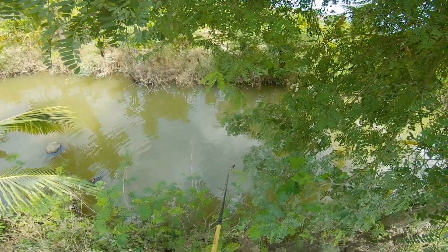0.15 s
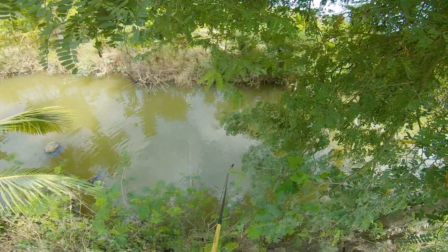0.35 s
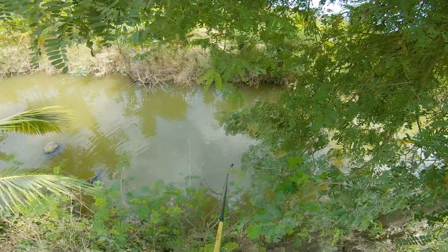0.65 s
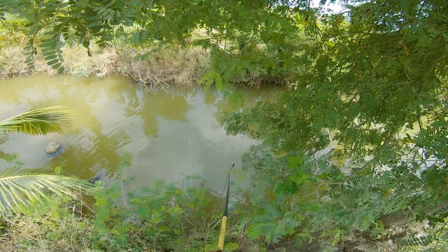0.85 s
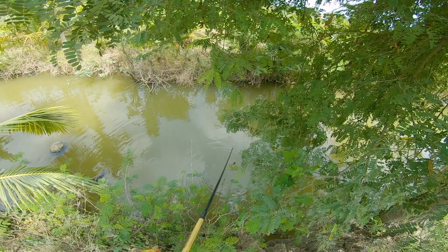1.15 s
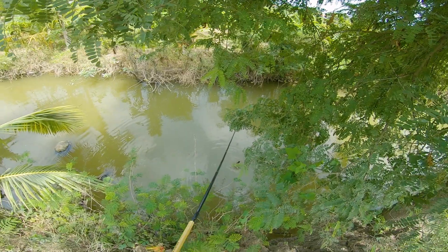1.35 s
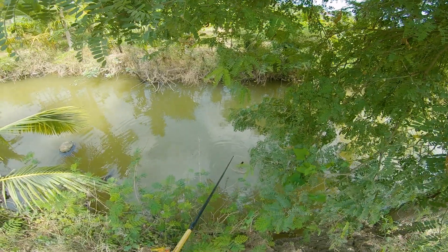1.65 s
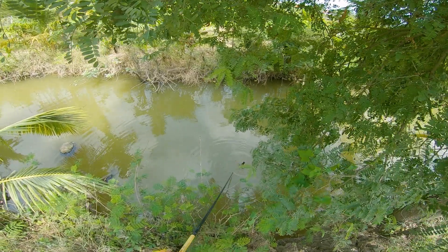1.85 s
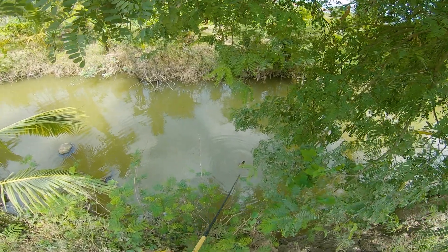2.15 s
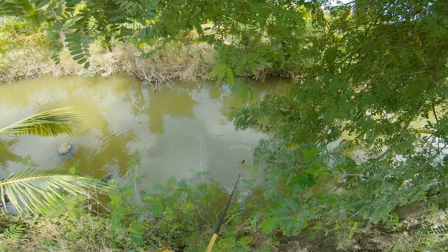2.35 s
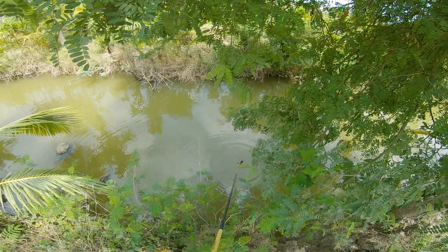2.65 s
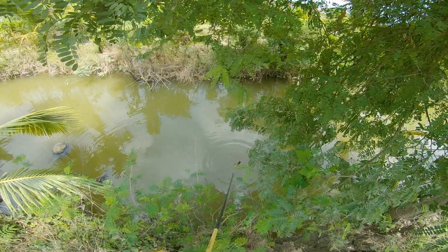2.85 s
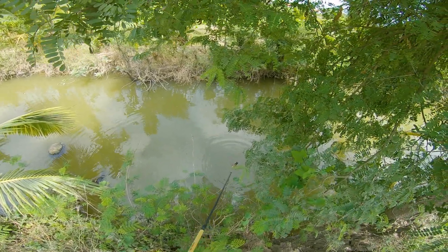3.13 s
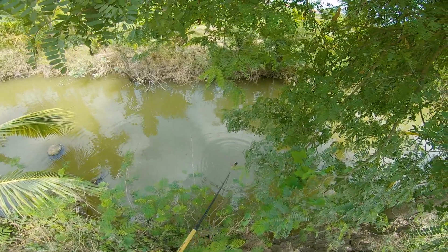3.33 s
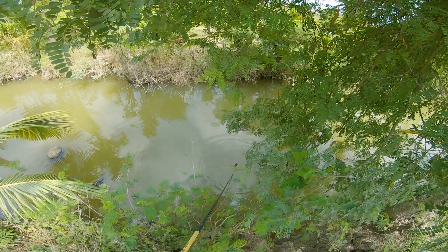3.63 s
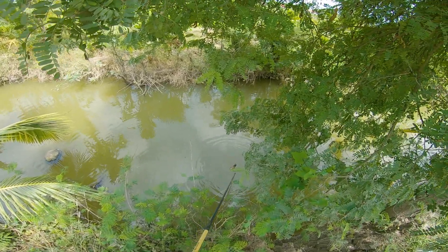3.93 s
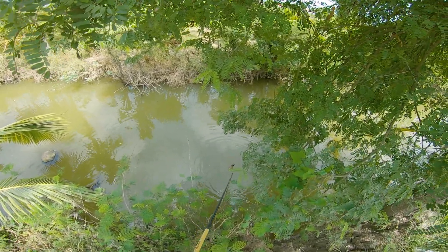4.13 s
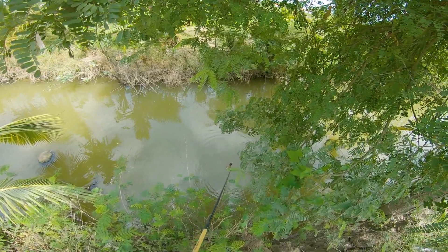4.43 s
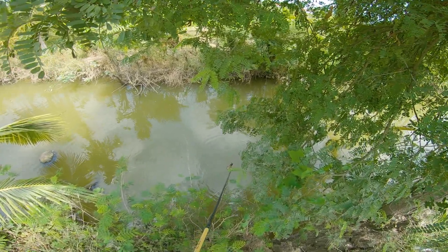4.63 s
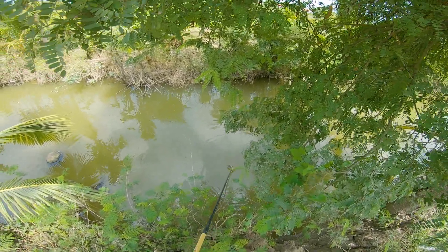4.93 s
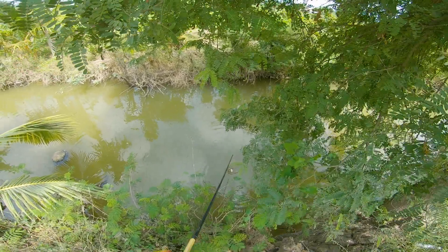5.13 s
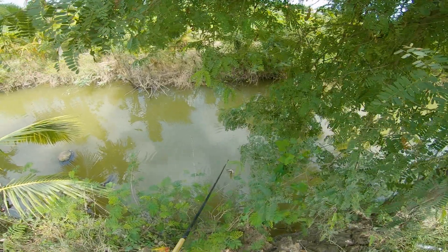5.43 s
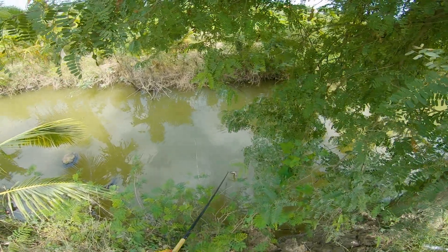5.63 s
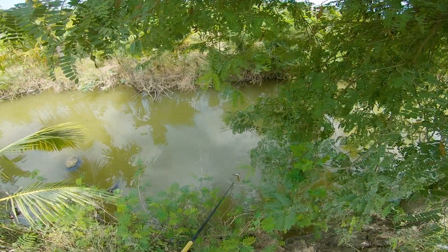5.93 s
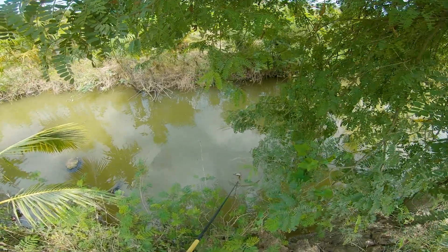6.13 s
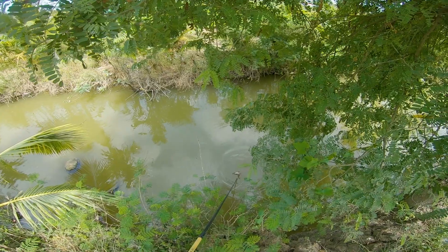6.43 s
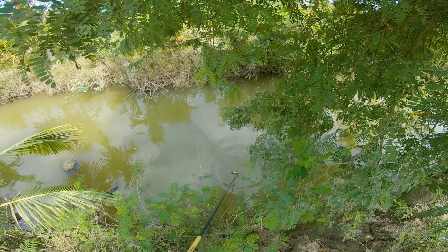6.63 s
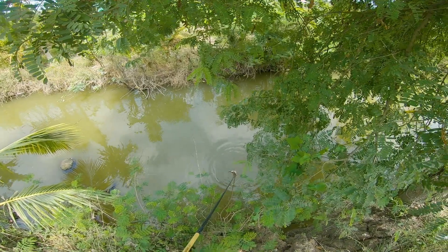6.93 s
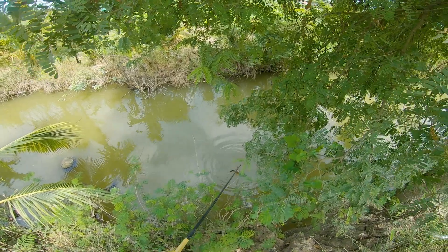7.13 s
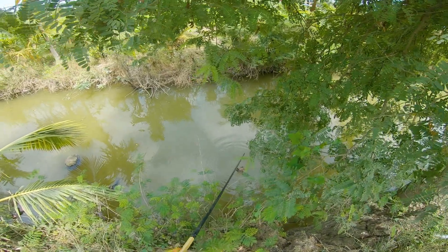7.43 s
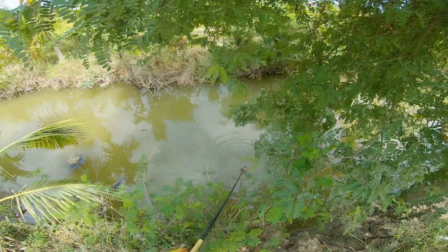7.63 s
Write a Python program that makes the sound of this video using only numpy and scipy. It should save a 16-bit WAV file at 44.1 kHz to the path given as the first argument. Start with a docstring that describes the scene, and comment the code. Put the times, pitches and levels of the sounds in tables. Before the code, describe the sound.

A calm outdoor place with trees, soft hush and faint, uneven low air rumble, strongest in the first two seconds. Tiny chirps begin at once; thin whistles sweep upward into a flick at about 0.6, 3.0, 4.9 and 6.7 s. Distant doves trill from 1.1 s, while leaves brush softly and dull twigs snap around 1.6-1.75 s. A clear near dove, left of centre, coos at 1.9, 4.3 and 7.15 s: a fast, throaty stutter around 1.2 kHz, slowing over half a second to a longer last note. Far doves overlap at 2 s and answer again from 5.4 to 6.7 s. A small bird rasps seven quick dry notes at 3.9-4.35 s. A faint, very high insect throbs increasingly. Close leaves rustle from 5.1 to 6.3 s with a crisp snap near 5.5, then again from 7.2 s, with sharp cracks at 7.6 and 7.7 s.

```python
"""Beside a pond, a dove coos three stuttering phrases; other doves answer from farther off. Doves are gliding
tones through a throat resonance; small birds whistle and chirp as bare gliding tones. Scolding notes are bursts
of band noise, and an insect is narrow-band noise that throbs at a high pitch. Close by, something rustles in
coloured slips, twigs snap in bursts, and one stem rings as it breaks. Moving air is a soft low rumble of noise
under the hush of the trees."""
import sys
import numpy as np
from scipy import signal
from scipy.fft import rfft, irfft, next_fast_len
from scipy.io import wavfile
from scipy.ndimage import uniform_filter1d, map_coordinates

SR = 44100
rng = np.random.default_rng(int(sys.argv[2]) if len(sys.argv) > 2 else 0)


def dump(signal):
    """Clip the signal to [-1, 1] and save it as 16-bit WAV at the path in sys.argv[1]."""
    limited = np.clip(np.atleast_2d(signal).T, -1, 1)
    pcm = np.round(limited * 32767).astype(np.int16)
    wavfile.write(sys.argv[1], SR, pcm)


N = 342944  # length [samples]


def amp(db):
    """Level to amplitude: 20 dB is a factor of ten."""
    return 10 ** (np.asarray(db) / 20)


def unit(x):
    """Normalisation: scale to an rms of 1."""
    return x / np.sqrt(np.mean(x ** 2) + 1e-20)


def clock():
    """Sampling: the time of every sample [s]."""
    return np.arange(N) / SR


def along(points, hz):
    """Interpolation of (frequency [Hz], value) points along a logarithmic frequency axis."""
    f, v = np.transpose(points)
    return np.interp(np.log(hz + 1), np.log(f + 1), v)


def gains(rows):
    """Envelopes: a gain per sample for each level column, silent outside the rows."""
    s, *columns = np.transpose(rows)
    return [amp(np.interp(clock(), s, c, left=-np.inf, right=-np.inf)) for c in columns]


def wobble(rate):
    """Random modulation: a smooth curve through normally distributed knots, rate knots a second."""
    knots = rng.standard_normal(int(N * rate / SR) + 4)
    return map_coordinates(knots, [clock() * rate])


def filtered(x, response):
    """Linear filtering: the spectrum of x times a complex response of frequency."""
    m = next_fast_len(N + SR // 2)
    return irfft(rfft(x, m) * response(np.fft.rfftfreq(m, 1 / SR)), m)[..., :N]


# Coherence of a diffuse field between left and right: (frequency [Hz], correlation [-1 to 1])
COHERENCE = [(25, .5), (70, .72), (300, .5), (700, .1), (1400, -.35), (3000, .05), (10000, 0)]


def stereo(pair, spectrum):
    """Partial coherence: colour two unrelated signals and blend them as mid and side, rms 1."""
    def blend(hz):
        angle = np.arccos(np.clip(along(COHERENCE, hz), -1, 1)) / 2
        return amp(along(spectrum, hz)) * [np.cos(angle), np.sin(angle)]

    mid, side = filtered(pair, blend)
    return unit(np.array([mid + side, mid - side]))


def panned(x, pan_db):
    """Level difference between the channels: louder on the left by pan_db."""
    return x * amp([[pan_db / 2], [-pan_db / 2]])


# Decay of the scattered sound among the trees: (frequency [Hz], time to fall by 60 dB [s])
TREE_DECAY = [(500, 0.24), (1200, 0.36), (5000, 0.53), (10000, 0.079)]


def placed(x, pan_db, lag_ms, wet_db):
    """Localisation by level and delay (left late by lag_ms), plus exponentially decaying scattering."""
    f, t, z = signal.stft(rng.standard_normal((2, SR // 2)), SR, nperseg=256)
    decay = amp(-60 * t / along(TREE_DECAY, f)[:, None])
    tail = signal.istft(z * decay, SR, nperseg=256)[1]
    tail = tail / np.linalg.norm(tail[0])
    echo = signal.fftconvolve(x[None], tail, axes=1)[:, :N]
    # half the lag delays the left, the other half advances the right
    direct = filtered(x, lambda hz: np.exp(np.outer([-1j, 1j], np.pi * hz * lag_ms / 1000)))
    return panned(direct, pan_db) + amp(wet_db) * echo


def sing(notes, fade, sag_db, jitter, flutter_db, swell_db=0):
    """Phase integration: a sine follows each note (s, length s, start, middle, end Hz, dB) along a parabola."""
    t, pitch, level, voiced = clock(), np.zeros(N), np.zeros(N), np.zeros(N)
    for s, length, start_hz, middle_hz, end_hz, db in notes:
        span = slice(int(s * SR), int((s + length) * SR))
        u = (t[span] - s) / length
        pitch[span] = (start_hz * (1 - u) * (1 - 2 * u)
                       + middle_hz * 4 * u * (1 - u)
                       + end_hz * u * (2 * u - 1))
        # the level swells through the note and sags where the pitch falls below its middle
        fallen = np.clip((middle_hz - pitch[span]) / (abs(middle_hz - end_hz) + 100), 0, 1)
        level[span] = amp(db - swell_db * (1 - u) - sag_db * u * u * fallen)
        voiced[span] = 1
    pitch = np.interp(t, t[voiced > 0], pitch[voiced > 0]) * (1 + jitter * wobble(300))
    window = np.hanning(int(fade * SR) + 3)
    level = signal.fftconvolve(level, window / window.sum(), "same") * amp(flutter_db * wobble(90))
    return np.sqrt(2) * level * np.sin(2 * np.pi * np.cumsum(pitch) / SR)


# Swells of the low rumble: (time [s], relative level [dB])
RUMBLE_LEVEL = [(0.0, -44), (0.04, -45), (0.3, -53.5), (0.37, -43.5), (0.69, -67), (0.86, -40.5),
                (0.95, -40), (1.28, -66), (1.36, -58), (1.54, -61), (1.75, -43), (1.95, -52.5),
                (3.51, -70.5), (3.61, -52.5), (3.81, -69.5), (4.12, -53), (4.4, -60.5), (4.44, -49.5),
                (4.55, -69), (5.52, -56), (5.7, -77), (5.83, -47.5), (5.89, -75), (5.91, -63),
                (6.56, -72.5), (6.69, -52), (6.73, -72), (6.84, -43.5), (6.91, -60), (7.3, -62),
                (7.32, -48), (7.62, -73), (7.69, -52), (7.78, -61)]
# Colour of the rumble: (frequency [Hz], relative density [dB per Hz])
RUMBLE_COLOUR = [(12, -36), (20, -12.5), (48, 5), (64, 5.5), (108, -11), (300, -30), (390, -63),
                 (660, -120)]
# Colour of the hush in the trees: (frequency [Hz], relative density [dB per Hz])
HUSH_COLOUR = [(59, -15.5), (100, 0.5), (258, -6), (370, -13), (447, -12.5), (497, -16), (843, -9),
               (998, -13.5), (1290, -10), (4960, -21), (6810, -25.5), (8410, -29), (11100, -34.5),
               (12600, -65), (15500, -59)]


def air(lumps_db=2.5):
    """Broadband flow noise: a low, lumpy rumble under the wavering hush of the trees."""
    lumps = amp(lumps_db * wobble(11))
    rumble = gains(RUMBLE_LEVEL)[0] * lumps * stereo(rng.standard_normal((2, N)), RUMBLE_COLOUR)
    hush = amp(-61.5 + 2.6 * wobble(3.183)) * stereo(rng.standard_normal((2, N)), HUSH_COLOUR)
    return panned(amp(-0.14) * rumble + hush, pan_db=-1.1)


# Strength of the insect before throbbing: (time [s], level [dB])
INSECT_LEVEL = [(0, -81), (1, -76), (3.2, -74), (4.1, -66), (5, -65), (6, -63), (7.8, -63)]
CALM_RATE, EAGER_RATE, EAGER_S = 6.52, 7.44, 3.53  # throbs [per s], calm and eager; turns eager at [s]


def insect(tick_rate=115, centre_hz=8570, width_hz=300, glide_hz=90):
    """Amplitude modulation: wing ticks and slower throbs shape a narrow band that rises in each throb."""
    t = clock()
    turn = 2 * np.pi * (CALM_RATE * t + (EAGER_RATE - CALM_RATE) * np.maximum(t - EAGER_S, 0))
    throb = np.abs(np.cos(turn / 2)) ** .8
    ticks = 1.7 ** np.cos(2 * np.pi * np.cumsum(tick_rate * (1 + .02 * wobble(8))) / SR)
    # low-passed noise moved up onto a gliding carrier
    band = filtered(rng.standard_normal((2, N)), lambda hz: 1 / (1 + (hz / width_hz) ** 2))
    ring = band * np.cos(2 * np.pi * np.cumsum(centre_hz + glide_hz * np.sin(turn)) / SR)
    return panned(unit(ring * ticks) * throb * gains(INSECT_LEVEL)[0], pan_db=3)


def chorus(count=70):
    """Superposition: many faint gliding notes of birds deep in the trees."""
    s, length, hz, glide, db = rng.random((5, count))
    start = (np.arange(count) + s / 2) * (N / SR - .1) / count
    hz = 2300 + 3200 * hz * hz
    glide = 1 + 0.23 * (glide - .5)
    notes = np.transpose([start, .02 + .035 * length, hz / glide, hz, hz * glide, -77.5 + 6 * db])
    return sing(notes, fade=.012, sag_db=2, jitter=.05, flutter_db=3)


# Rising whistles: (time where the slide breaks into the flick [s], relative level [dB])
WHISTLE_NOTES = [(.636, -54), (2.976, -55), (4.898, -56.5), (6.682, -53.5)]
# Thin chirps: (time [s], length [s], start pitch [Hz], end pitch [Hz], relative level [dB])
CHIRP_NOTES = [(.11, 0.019, 4650, 6300, -69.5), (.28, 0.024, 4640, 4250, -65),
               (0.349, 0.034, 4800, 4110, -62), (0.372, 0.052, 6550, 5520, -68),
               (0.866, .025, 6200, 5200, -62), (.94, .03, 3850, 5320, -63.5), (.995, .035, 4100, 3920, -57),
               (1.016, 0.055, 3480, 2960, -59.5), (2.319, 0.053, 2800, 2180, -61.5),
               (2.44, 0.051, 3370, 3320, -66), (2.793, .1, 6000, 4940, -67.5),
               (3.242, 0.024, 5480, 6290, -63), (3.331, .02, 4150, 5300, -65),
               (4.983, 0.047, 2890, 2185, -57.5), (6.326, .02, 4670, 4350, -61),
               (6.366, .02, 4730, 4400, -59), (6.395, 0.024, 4900, 4400, -64)]
SLIDE_S, SLIDE_HZ, SLIDE_SWELL_DB = .125, (3750, 4600, 5040), 11.5  # length; start, middle, end; growth
FLICK_S, FLICK_HZ, FLICK_DB = .075, (5156, 5990, 6455), -2  # length; start, middle, end; re the slide


def small_birds():
    """Frequency modulation: whistles swell up a slide into a flick, chirps glide straight; foliage smears all."""
    slides = [(s - SLIDE_S, SLIDE_S, *SLIDE_HZ, db) for s, db in WHISTLE_NOTES]
    flicks = [(s, FLICK_S, *FLICK_HZ, db + FLICK_DB) for s, db in WHISTLE_NOTES]
    glides = [(s, length, start, (start + end) / 2, end, db) for s, length, start, end, db in CHIRP_NOTES]
    whistles = sing(slides, fade=.014, sag_db=0, jitter=.02, flutter_db=2.5, swell_db=SLIDE_SWELL_DB)
    whistles = whistles + sing(flicks, fade=.014, sag_db=0, jitter=.014, flutter_db=2)
    chirps = sing(glides, fade=.012, sag_db=0, jitter=.035, flutter_db=3)
    return (amp(-1) * placed(whistles, pan_db=6.5, lag_ms=0.044, wet_db=0)
            + amp(-4.5) * placed(chirps, pan_db=-10, lag_ms=0, wet_db=0)
            + amp(-1) * placed(chorus(), pan_db=0, lag_ms=0, wet_db=-3.5))


# A small bird's dry scolding notes: (time of the peak [s], level [dB])
SCOLD_NOTES = [(3.925, -68), (3.987, -64), (4.055, -62), (4.125, -61), (4.191, -59), (4.26, -61.5),
               (4.35, -65.5)]


def scolding(length=0.0091):
    """Gated band noise: short raspy notes with Gaussian envelopes in a quick row."""
    level = sum(amp(db) * np.exp(-.5 * ((clock() - s) / length) ** 2) for s, db in SCOLD_NOTES)
    # (frequency [Hz], relative level [dB])
    colour = [(2000, -55.0), (3500, -10.5), (5000, -9), (6500, -2), (7600, -13), (9000, -42)]
    rasp = filtered(rng.standard_normal(N), lambda hz: amp(along(colour, hz)))
    return placed(level * unit(rasp), pan_db=-6, lag_ms=0, wet_db=-3)


def crackle(rate, spread_db, hiss, patchy_db):
    """Stick-slip friction: sparse slips of uneven size on hiss; the colour shifts in patches."""
    slips = (rng.random((2, N)) < rate / SR) * rng.standard_normal((2, N))
    sizes = amp(spread_db * np.minimum(rng.exponential(size=(2, N)), 2))
    z = signal.stft(unit(slips * sizes) + hiss * rng.standard_normal((2, N)), nperseg=512)[2]
    # smooth random patches over frequency, then time
    patches = uniform_filter1d(rng.standard_normal(z.shape[1:]), size=4, axis=0)
    patches = uniform_filter1d(patches, size=7, axis=1)
    return signal.istft(z * amp(patchy_db * unit(patches)), nperseg=512)[1][:, :N]


# Brushes of close rustling: (time of the peak [s], rise [s], fall [s], # relative rub level [dB], relative
# crisp level [dB])
BRUSH_STROKES = [(1.36, .33, 0.14, -50.5, -65.5), (1.455, 0.095, 0.055, -49, -67),
                 (1.781, 0.6, 0.59, -57, -69.5), (5.223, .12, .05, -44, -59),
                 (5.311, 0.046, 0.15, -39.5, -53), (5.409, 0.17, 0.014, -48.5, -43.5),
                 (5.48, 0.041, 0.031, -42, -34), (5.89, 0.12, 0.18, -45, -62),
                 (6.165, 0.12, 0.16, -53, -72), (6.36, 0.11, 0.21, -61.5, -74),
                 (7.3, 0.22, 0.019, -54.5, -60), (7.372, 0.091, 0.14, -48, -62.5),
                 (7.5, .1, 0.11, -46, -45), (7.584, 0.039, 0.038, -39, -35), (7.662, 0.02, 0.044, -40, -44),
                 (7.743, 0.11, 0.019, -37.5, -45)]
BRUSH_DROP_DB, BRUSH_SHAPE = 18.5, 1.31  # level lost over a rise or fall time; roundness of the peak
# Spells of light, steady rustling: (from [s], to [s])
CONTACTS = [(5.05, 6.3), (7.18, 7.76)]
TOUCH_RUB_DB, TOUCH_CRISP_DB, TOUCH_FADE_S = -63, -68.5, .06  # relative levels; fade


def brushing():
    """Power addition: the rub and crisp gains of every swelling brush add to the light contact."""
    t = clock()
    touch = sum(np.clip(np.minimum(t - start, end - t) / TOUCH_FADE_S + .5, 0, 1)
                for start, end in CONTACTS)
    power = (amp([[TOUCH_RUB_DB], [TOUCH_CRISP_DB]]) * touch) ** 2
    for s, rise, fall, rub_db, crisp_db in BRUSH_STROKES:
        away = np.abs(np.maximum((s - t) / rise, (t - s) / fall))
        swell = amp(-BRUSH_DROP_DB * np.minimum(away, 10) ** BRUSH_SHAPE)
        power += (amp([[rub_db], [crisp_db]]) * swell) ** 2
    return np.sqrt(power)


# Papery colour of the rub: (frequency [Hz], relative density [dB per Hz])
RUB_COLOUR = [(700, -27), (1100, -9.5), (1300, 5), (1550, -2), (1880, 10), (2200, -7), (2700, 1),
              (3100, -5), (3500, 2), (4100, -9.5), (6000, -10), (9000, -25), (12000, -48)]
# Crisp colour of the rub pressed harder: (frequency [Hz], relative density [dB per Hz])
CRISP_COLOUR = [(2500, -40.5), (4500, 1.5), (6000, -2), (7500, 3.5), (10000, 1.5), (11300, -20),
                (12500, -23.5), (14300, -18), (15600, -58)]


def rustle():
    """Friction noise: a rub with a papery body turns crisp when pressed harder."""
    rub, crisp = brushing()
    catches = unit(amp(2.9 * wobble(60)))  # the rub catches and lets go
    papery = crackle(rate=1500, spread_db=0.5, hiss=0.79, patchy_db=3.5)
    brittle = crackle(rate=5000, spread_db=2.0, hiss=0.34, patchy_db=3.5)
    body = rub * stereo(papery, RUB_COLOUR) * amp(5.5)
    edge = crisp * stereo(brittle, CRISP_COLOUR) * amp(3.5)
    return catches * (body + edge)


# Twigs that tick and snap: (time [s], relative peak level [dB], treble tilt [dB],
# time to fall by 60 dB [s])
TWIG_SNAPS = [(0.457, -43, -1, 0.15), (1.214, -35.5, 0, .07), (1.619, -24.5, -29, 0.028),
              (1.637, -23.5, -38, .04), (1.656, -28, -18, 0.012), (1.668, -21.5, -37, 0.023),
              (1.703, -19.5, -34, .022), (1.745, -25.5, -10.5, .04), (2.399, -43.5, -4, .11),
              (3.54, -37, -7, 0.088), (5.319, -23, -7, .023), (5.445, -24.5, -6, 0.094),
              (5.473, -32, 2, .013), (5.491, -14, 9, 0.0099), (5.644, -32.5, -11, 0.06),
              (5.711, -29.5, -13.5, 0.031), (5.758, -29, 0, 0.039), (6.185, -22.5, -20, .04),
              (6.883, -35.5, -5, 0.18), (7.611, -17, 4, .028), (7.727, -15.5, 11, .038)]
# Colour of a twig before its treble tilt: (frequency [Hz], relative density [dB per Hz])
TWIG_COLOUR = [(600, -58), (1100, -4), (1350, 6), (1600, 0), (1900, 9.5), (2400, -3.5), (3500, 1),
               (5500, 0), (7500, -7.5), (10000, -10.5), (11500, -32), (15000, -44)]


def snaps():
    """Impulsive release: each twig scrapes for an instant, lets go and decays, dull or bright."""
    out, size, lead = np.zeros((2, N + SR)), 4096, 256
    t, hz = (np.arange(size) - lead) / SR, np.fft.rfftfreq(size, 1 / SR)
    for s, db, treble_db, t60 in TWIG_SNAPS:
        tilt = treble_db * along([(2000, 0), (7000, 1)], hz)
        colour = amp(along(TWIG_COLOUR, hz) + tilt)
        noise = rng.standard_normal((2, size)) + rng.standard_normal(size) / 2  # partly shared by both sides
        envelope = amp(-60 * np.maximum(t / t60, -t / .01))
        burst = unit(irfft(rfft(noise) * colour)) * envelope
        first = round(s * SR) - lead
        out[:, first:first + size] += amp(db - 11) * burst
    return out[:, :N]


# Modes of the breaking stem: (frequency [Hz], relative level [dB], time to fall by 60 dB [s])
STEM_MODES = [(1865, -18.5, 0.02), (2700, -12, 0.0065), (3590, -9.5, 0.012), (4570, -8.5, 0.0052),
              (6950, -11, 0.0071), (10000, -16.5, 0.0067), (13500, -34, 0.0059)]
CRACK_S = 7.6195


def crack():
    """Modal ringing: a breaking stem rings for a few milliseconds, too thin to radiate bass."""
    t = np.maximum(clock() - CRACK_S, 0)
    ring = 0
    for hz, db, t60 in STEM_MODES:
        phase = rng.uniform(0, 2 * np.pi, (2, 1))
        ring = ring + amp(db - 60 * t / t60) * np.sin(2 * np.pi * hz * t + phase)
    onset = 1 - np.exp(-t / .0002)
    high_pass = signal.butter(4, 1700, "high", fs=SR, output="sos")
    return panned(signal.sosfilt(high_pass, ring * onset) * amp(-0.4), pan_db=-2.0)


# Shading of very close sounds: (frequency [Hz], left minus right [dB])
NEAR_SHADING = [(1000, -3), (2400, -1), (3800, -2.5), (5500, -6.5), (8000, 1), (12000, 8.5)]


def undergrowth():
    """Side shading: the rustle, twigs and stem reach each side in another colour."""
    close = rustle() + snaps() + crack()
    return filtered(close, lambda hz: amp(np.outer([.5, -.5], along(NEAR_SHADING, hz))))


THROAT_HZ, NEAR_WIDTH_HZ = 1012, 76  # resonance of the throat; its bandwidth in the near dove
FAR_WIDTH_HZ = 200  # the far throats ring less sharply


def throat(tone, width_hz):
    """Resonance: a dove's inflated throat makes a note flare as its pitch passes through."""
    return filtered(tone, lambda f: 1j * f * width_hz / (THROAT_HZ ** 2 - f * f + 1j * f * width_hz))


LOW_HZ, TOP_NOTE_HZ, ARCH_HZ, END_HZ = 907, 1285, 1166, 1060  # pitches of a far phrase at ratio 1
SCOOP_S, SHORT_NOTE_S, LAST_NOTE_S = .03, .036, .092
LAST_GAP_S, GAP_SHARE = .102, .73  # the stutter slows: each gap is this share of the next


def answer(s, hold, count, ratio, db, scoop_db=2.0, held_db=-2, last_db=-.5, sag_hz_per_s=480):
    """Geometric timing: a scoop, a sagging held note, then a slowing stutter with a long last note."""
    low, top, arch, end = ratio * np.array([LOW_HZ, TOP_NOTE_HZ, ARCH_HZ, END_HZ])
    gaps = LAST_GAP_S * GAP_SHARE ** np.arange(round(count) - 1)[::-1]
    onsets = s + hold + np.append(0, np.cumsum(gaps))
    sag = sag_hz_per_s * hold
    return [(s, SCOOP_S, low, (low + end) / 2, end, db + scoop_db),
            (s + SCOOP_S, hold - SCOOP_S, top, top - .3 * sag, top - sag, db + held_db),
            *[(at, SHORT_NOTE_S, low, arch, end, db) for at in onsets[:-1]],
            (onsets[-1], LAST_NOTE_S, low, top - sag / 2, end, db + last_db)]


# Phrases of distant doves: (time [s], delay to the first short note [s], notes in the stutter,
# pitch ratio, relative level [dB])
FAR_PHRASES = [(1.125, 0.24, 4, 0.96, -57.5), (2.005, 0.17, 3, 1.017, -48.5), (2.72, 0.19, 3, 1.026, -64.5),
               (5.365, .253, 4, .98, -59), (5.814, .174, 3, 1, -48), (6.4, .17, 3, 1.02, -62.5)]
# Deeper doves far away: (time [s], length [s], start, middle and end pitch [Hz], relative level [dB])
DEEP_NOTES = [(.04, .14, 720, 660, 638, -73), (.2, 0.094, 639, 720, 754, -62.5),
              (1.53, 0.16, 773, 660, 590, -65.5), (3.25, .16, 860, 831, 795, -69),
              (3.43, 0.16, 549.5, 535, 610, -71.5), (7.29, 0.032, 770, 822, 833, -50.5)]


def far_doves():
    """Reverberant distance: soft answers from across the pond carry much scattered sound."""
    notes = [note for phrase in FAR_PHRASES for note in answer(*phrase)]
    trills = throat(sing(notes, fade=.015, sag_db=3, jitter=.007, flutter_db=3), FAR_WIDTH_HZ)
    deep = sing(DEEP_NOTES, fade=.03, sag_db=2, jitter=.04, flutter_db=3)
    return (amp(0.14) * placed(trills, pan_db=-10.5, lag_ms=0.2, wet_db=-5)
            + amp(-6.5) * placed(deep, pan_db=0, lag_ms=0, wet_db=1.0))


# Notes of the near dove's phrase: (time from its start [s], length [s],
# start, middle and end pitch [Hz], relative level [dB])
COO_PHRASE = [(.004, 0.0294, 944.6, 1006, 1020, -19), (0.033, 0.0432, 1137, 1300, 1225, -9),
              (0.076, 0.0327, 1212, 1311, 1210, -11.5), (0.108, .036, 1193, 1275, 1162, -10.5),
              (0.147, 0.037, 1130, 1252, 1096, -11), (0.19, .042, 994, 1209, 1000, -14.5),
              (0.245, .036, 922, 1185, 1015, -15), (.305, .036, 895, 1180, 1020, -16.5),
              (0.383, .044, 920, 1186, 1047, -16), (0.501, .030, 908, 1164, 1258, -18.5),
              (.530, .055, 1261, 1215, 1107, -14.5)]
# Phrases of the near dove: (time [s], relative level [dB])
COO_TIMES = [(1.901, -3), (4.298, -1.5), (7.151, -2)]


def near_dove(breath_db=-24):
    """Source and resonator: notes scoop across the throat's resonance, which flares and beats against them."""
    notes = [(s + at, *pitches, db + note_db)
             for s, db in COO_TIMES for at, *pitches, note_db in COO_PHRASE]
    coo = throat(sing(notes, fade=.011, sag_db=16, jitter=.003, flutter_db=.8), NEAR_WIDTH_HZ)
    # a hoarse puff comes just before each note that starts below the resonance
    puffs = sum(amp(db) * np.exp(-.5 * ((clock() - s + .007) / .007) ** 2)
                for s, _, start_hz, *_, db in notes if start_hz < THROAT_HZ)
    hoarse = unit(filtered(rng.standard_normal(N), lambda f: np.exp(-.5 * ((f - 1090) / 140) ** 2)))
    voice = amp(-6) * (coo + amp(breath_db) * puffs * hoarse)
    return placed(voice, pan_db=-10.5, lag_ms=.28, wet_db=-20)


def scene():
    """Superposition: the sounds of everything around the pond add."""
    background = air() + insect() + small_birds() + scolding()
    return background + amp(0.22) * undergrowth() + far_doves() + near_dove()


def record(dry, top_hz=15600):
    """Band limitation: nothing passes above top_hz."""
    return filtered(dry, lambda hz: hz < top_hz)


dry = scene()
out = record(dry)
dump(out)
```